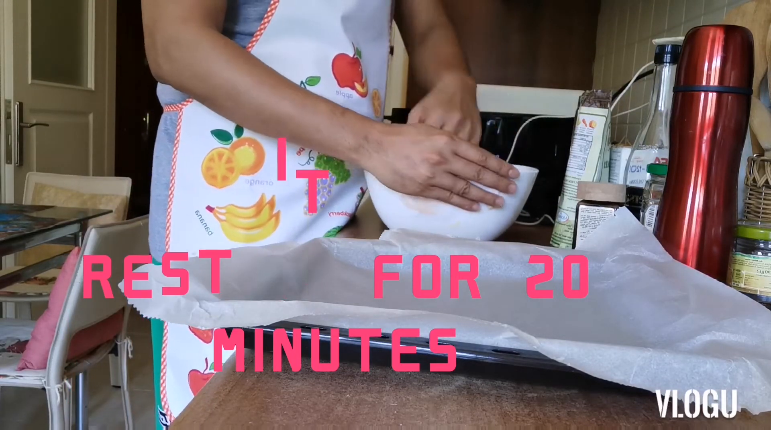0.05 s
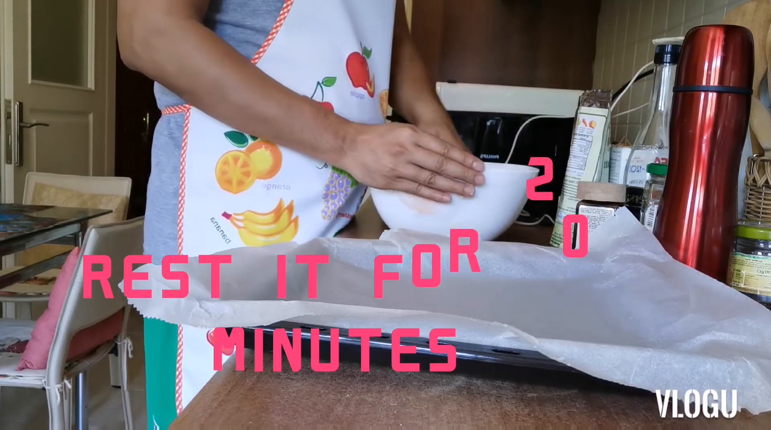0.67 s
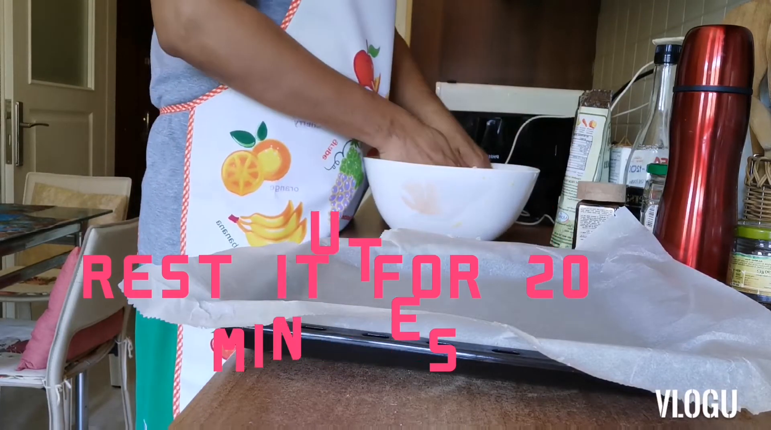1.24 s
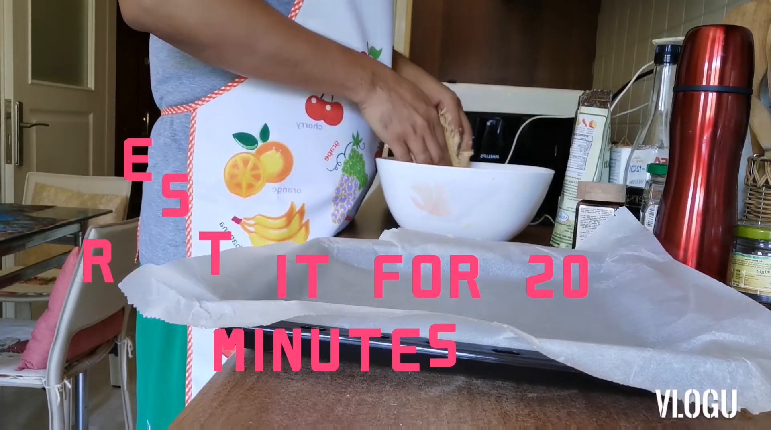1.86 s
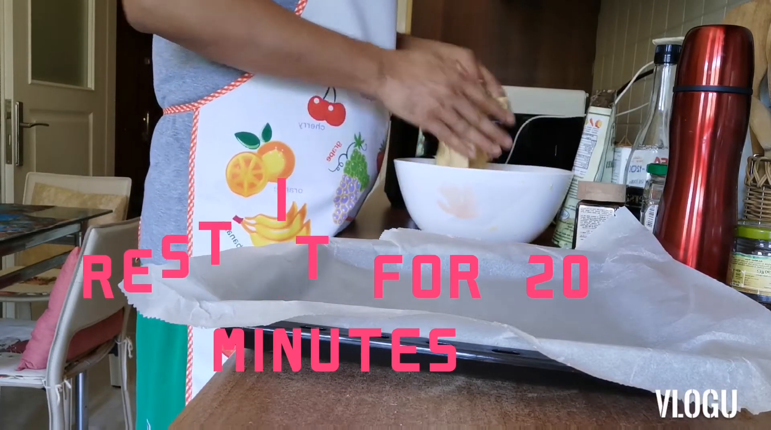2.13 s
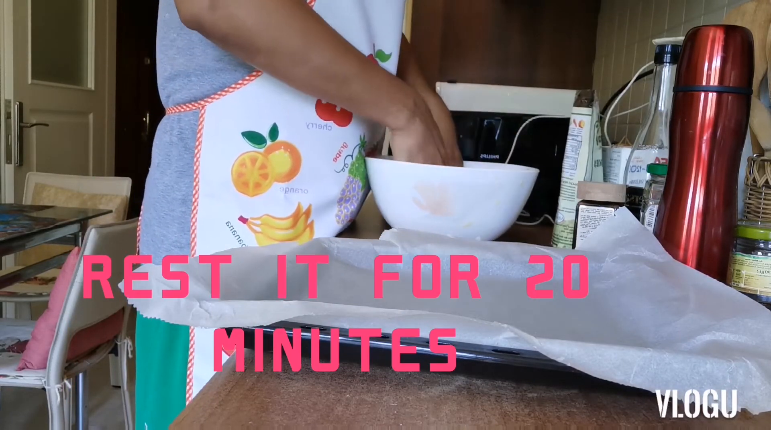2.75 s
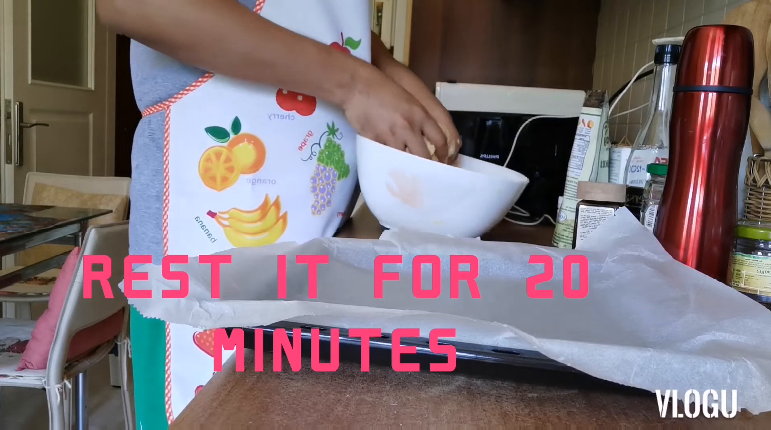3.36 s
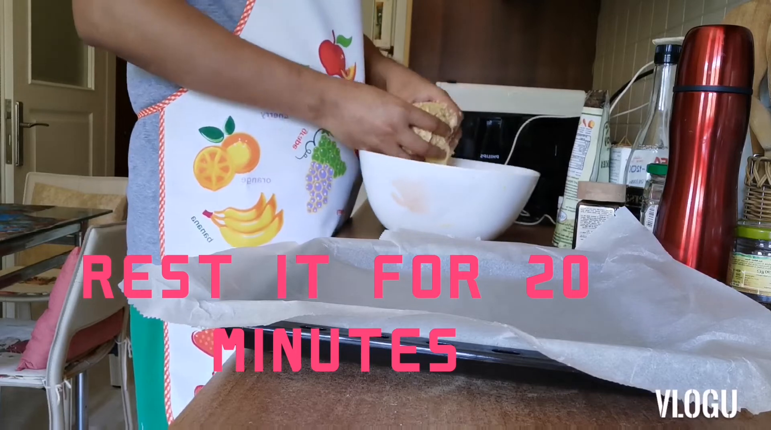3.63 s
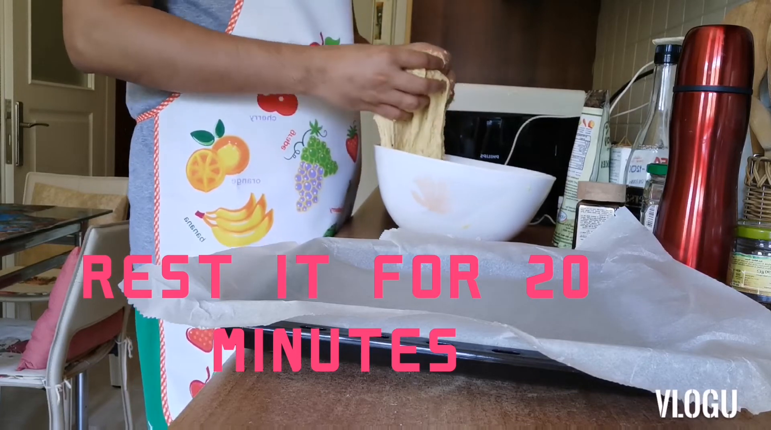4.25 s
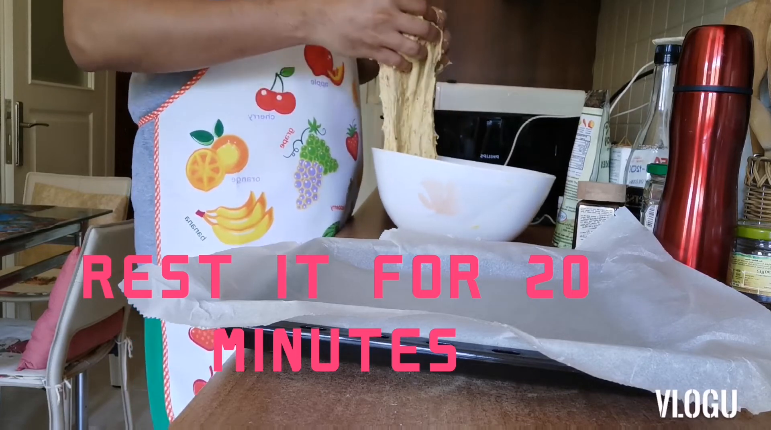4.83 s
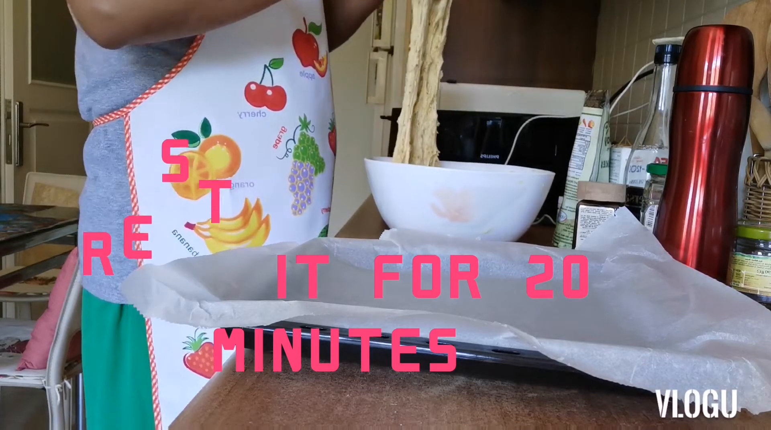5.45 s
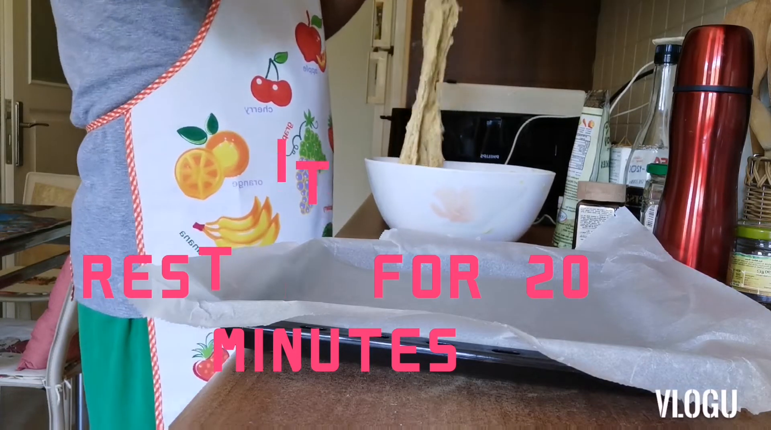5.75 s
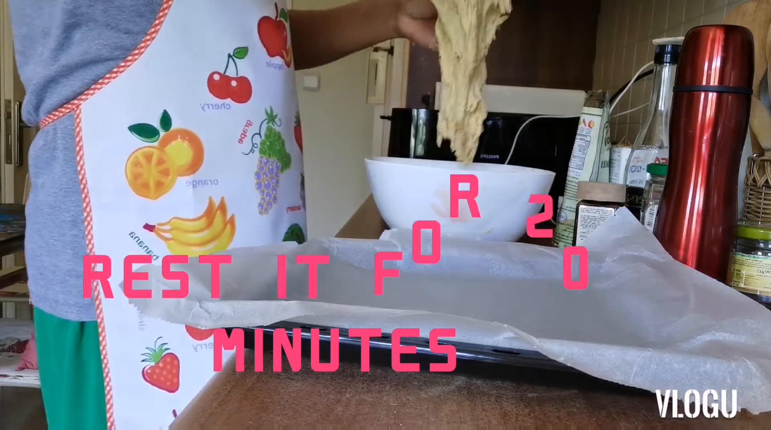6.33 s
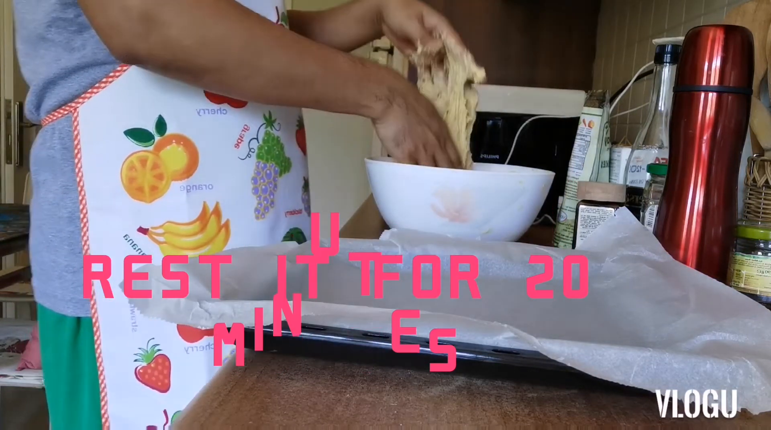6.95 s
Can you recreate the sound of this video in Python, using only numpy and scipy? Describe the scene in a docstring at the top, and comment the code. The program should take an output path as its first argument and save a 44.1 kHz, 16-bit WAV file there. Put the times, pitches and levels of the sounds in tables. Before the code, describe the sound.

Close to the microphone in a small, quiet kitchen, a bowl of dough bumps down on a worktop. Soft wet squeezing follows, mixed with hollow scuffs, a faint ring of the rim and a brief groan from the bowl's foot. Two loud knocks with wet splats come about a second and a half apart, then a couple of dull bumps. Hands and apron swish faintly over a low room hum.

```python
"""Soft, sticky dough squelches and hands and apron swish: someone is kneading at a kitchen worktop.
The bowl lifts with the dough and knocks back down with a thud and a wet splat. Its foot scuffs and
groans along the top, and once a light catch sets its rim ringing. All is close to a single
microphone; behind it, a small room with a low hum answers."""
import sys
import numpy as np
from scipy import signal
from scipy.fft import rfft, irfft
from scipy.io import wavfile
from scipy.ndimage import uniform_filter1d

SR = 44100
rng = np.random.default_rng(int(sys.argv[2]) if len(sys.argv) > 2 else 0)


def dump(signal):
    """Clip the signal to [-1, 1] and save it as 16-bit WAV at the path in sys.argv[1]."""
    limited = np.clip(np.atleast_2d(signal).T, -1, 1)
    pcm = np.round(limited * 32767).astype(np.int16)
    wavfile.write(sys.argv[1], SR, pcm)


N = 308259
BLOW_SIZE = 16384  # samples in one short sound
TIME = np.arange(N) / SR
AGE = np.arange(BLOW_SIZE) / SR


def amp(db):
    """Decibels to gain."""
    return 10 ** (np.asarray(db) / 20)


def unit(x):
    """Scale to rms 1."""
    return x / np.sqrt(np.mean(x ** 2))


def unit_blow(x):
    """Scale a short sound to the energy of 20 ms at rms 1."""
    return x / np.sqrt(np.sum(x ** 2) / (.02 * SR))


def decay(t60):
    """A fade that falls 60 dB in t60 seconds."""
    return np.exp(-np.log(1000) * AGE / t60)


def burst(fade_s):
    """White noise dying away with time constant fade_s."""
    return rng.standard_normal(BLOW_SIZE) * np.exp(-AGE / fade_s)


def read(points, hz):
    """Read a table of (f/Hz, value) on a log-frequency axis."""
    f, value = np.transpose(points)
    return np.interp(np.log(np.maximum(hz, 1)), np.log(f), value)


def colour(x, points, size=8192):
    """Causal filter with the given (f/Hz, level/dB) shape."""
    gain = amp(read(points, np.fft.rfftfreq(size, 1 / SR)))
    cepstrum = irfft(np.log(gain))
    cepstrum[1:size // 2] *= 2
    cepstrum[size // 2 + 1:] = 0
    response = irfft(np.exp(rfft(cepstrum)))
    return signal.fftconvolve(x, response)[:len(x)]


def diffuse(x, size):
    """Even out a random burst's spectrum over `size` bins, so that it adds no boom of its own."""
    power = uniform_filter1d(np.abs(rfft(x)) ** 2, size=size)
    hz = np.fft.rfftfreq(len(x), 1 / SR)
    return colour(x, np.column_stack([hz, -10 * np.log10(power)])[1:])


def add(track, s, sound):
    """Mix a sound into the track at time s."""
    start = int(s * SR)
    track[start:start + len(sound)] += sound[:N - start]


def walk(rate):
    """A random wander with a spread near 1, taking `rate` steps a second."""
    steps = rng.standard_normal(4096)
    return np.interp(TIME * rate, np.arange(len(steps)), steps)


def wavering_tone(hz, drift_hz, rate):
    """A sine whose pitch wanders about hz."""
    return np.sin(2 * np.pi * np.cumsum(hz + drift_hz * walk(rate)) / SR)


def slips(rate, spread_db):
    """Tiny random slips, `rate` a second; spread_db makes a few far larger than the rest."""
    size = amp(spread_db * np.minimum(rng.exponential(size=N), 4))
    slipping = rng.random(N) < rate / SR
    return unit(slipping * size * rng.standard_normal(N))


def strokes(rows, shape, fade_ratio):
    """Gain of hand strokes, each above half strength for its length; a higher shape is blunter."""
    gain = np.zeros(N)
    for peak, length, db in rows:
        swell_s = length / (1 + fade_ratio)
        away = np.maximum((peak - TIME) / swell_s, (TIME - peak) / (swell_s * fade_ratio))
        near = away < 10
        gain[near] += amp(db) * .5 ** (away[near] ** shape)
    return gain


# Room tone spectrum: f/Hz, level/dB (levels in all tables are relative)
AIR_COLOUR = [(12, -34.5), (20, 2), (70, -6.5), (137, -12), (219, -14.5), (245, -18.5), (282, -21),
              (324, -22), (427, -19), (581, -26.5), (958, -26), (1340, -29.5), (5690, -44.5),
              (10800, -38.5), (15500, -44.5)]

def background(air_db=-66, hum_hz=213, hum_db=-75, waver_db=3, drift_hz=5):
    """Room tone all round the microphone: faint rumble and hiss with a wavering hum."""
    air = unit(colour(rng.standard_normal(N), AIR_COLOUR)) * amp(.5 * walk(15))
    hum = wavering_tone(hum_hz, drift_hz, rate=15) * amp(waver_db * walk(31))
    return amp(air_db) * air + amp(hum_db) * unit(hum)


# The kitchen's decay: f/Hz, t60/s
ROOM_T60 = [(80, 0.63), (200, 0.31), (600, 0.31), (2000, 0.29), (5000, 0.27), (12000, 0.25)]

def room_response(wet_db, early_db, build_s=0.0049, early_s=0.0061):
    """Direct sound, quick echoes from the cupboards, and a dense tail whose bass lasts longest."""
    spectrum = rfft(rng.standard_normal(BLOW_SIZE))
    hz = np.fft.rfftfreq(BLOW_SIZE, 1 / SR)
    centres = np.array(ROOM_T60)[:, 0]
    tail = np.zeros(BLOW_SIZE)
    for share, (_, t60) in zip(np.eye(len(centres)), ROOM_T60):
        band = irfft(spectrum * read(np.column_stack([centres, share]), hz))
        tail += band * decay(t60)
    tail *= 1 - np.exp(-AGE / build_s)
    early = burst(early_s) * np.sqrt(AGE)
    echoes = amp(wet_db) * tail / np.linalg.norm(tail) + amp(early_db) * early / np.linalg.norm(early)
    return signal.unit_impulse(BLOW_SIZE) + echoes


def kitchen(x, wet_db, early_db):
    """From worktop to microphone: direct sound and small-room echoes, drawn afresh for each call."""
    response = diffuse(room_response(wet_db, early_db), size=36)
    return signal.fftconvolve(x, response)[:len(x)]


# Bright spectrum of brushing, also of snaps and rim scratches: f/Hz, level/dB
BRUSH_COLOUR = [(600, -15.5), (1600, -1), (2600, -0.5), (3600, -3.5), (5200, 0.5), (7600, -4.5),
                (8800, 4.5), (10900, 4.5), (11800, -2.5), (13000, -9), (14200, -9), (15500, -12.5)]
# Hands and apron at the worktop: peak t/s, length/s, level/dB
BRUSHES = [(.08, 0.17, -71.5), (.35, .22, -81.5), (.70, 0.18, -70.5), (.85, 0.068, -64.5),
           (1.12, 0.26, -70.5), (1.56, 0.21, -75.5), (1.755, .07, -70), (2.10, 0.31, -79.5),
           (2.63, 0.079, -61.5), (2.83, 0.54, -84), (3.36, .18, -73), (3.46, .07, -66.5),
           (4.285, 0.021, -74.5), (4.775, 0.067, -55.5), (5.01, 0.095, -70.5), (6.53, 0.082, -76.5),
           (6.93, 0.1, -65)]

def brushing(uneven_db=1):
    """Skin and cloth slide in a fine, dense grain."""
    grain = slips(rate=13000, spread_db=3.0) * amp(uneven_db * walk(60))
    return strokes(BRUSHES, shape=2.2, fade_ratio=1.05) * unit(colour(grain, BRUSH_COLOUR))


# Sticky threads snapping in the bowl: t/s, level/dB
SNAPS = [(1.518, -68), (3.002, -82), (4.006, -78), (4.604, -80)]

def snaps(snap_s=.0012):
    """Threads of dough part with tiny bright clicks."""
    out = np.zeros(N)
    for s, db in SNAPS:
        click = colour(burst(snap_s), BRUSH_COLOUR)
        add(out, s, amp(db) * unit_blow(click))
    return out


# The rim's ring: f/Hz, level/dB
RIM_MODES = [(3068, -9), (4129, 1), (5195, -2), (5652, -4), (6465, 0), (7074, -1), (9329, 2), (11090, 0),
             (12834, -12), (14616, -14)]
# One light catch on the rim, chattering: t/s, level/dB
RIM_TICKS = [(2.462, -65), (2.483, -63), (2.506, -66.5), (2.526, -70)]

def rim(level_db=-1, t60=0.09, detune=0.0089, scratch_s=0.019, scratch_db=1, touch_s=0.004):
    """Light grazing touches scratch the rim and wake its high modes."""
    out = np.zeros(N)
    onset = 1 - np.exp(-AGE / touch_s)
    for s, db in RIM_TICKS:
        ring = sum(amp(mode_db) * np.sin(2 * np.pi * hz * (1 + detune * rng.standard_normal()) * AGE)
                   for hz, mode_db in RIM_MODES)
        scratch = colour(burst(scratch_s), BRUSH_COLOUR)
        touch = unit_blow(ring * decay(t60)) + amp(scratch_db) * unit_blow(scratch)
        add(out, s, amp(db + level_db) * touch * onset)
    return out


# The squelch, heard close: f/Hz, level/dB
SQUELCH_COLOUR = [(60, -17), (150, -5), (240, -6.5), (400, -1.5), (640, -5.5), (880, -6), (1150, -16),
                  (2400, -19), (3300, -32.5), (5000, -37.5), (9000, -58)]
# Wet dough squeezed between the fingers: peak t/s, length/s, level/dB
SQUEEZES = [(.04, 0.29, -70), (.72, 0.22, -68), (1.17, 0.14, -73.5), (1.45, 0.16, -70.5),
            (1.59, 0.086, -61.5), (1.80, 0.079, -59.5), (1.99, .13, -60), (2.13, 0.11, -56),
            (2.61, 0.11, -51), (2.82, 0.17, -70.5), (3.315, 0.17, -56.5), (3.47, 0.062, -61.5),
            (3.63, 0.13, -61), (3.97, 0.12, -71), (5.03, 0.18, -75)]

def kneading(level_db=6, uneven_db=4.0):
    """Sticky dough peels from skin and bowl in a dense run of tiny slips."""
    peeling = slips(rate=2800, spread_db=0.0) * amp(uneven_db * walk(42))
    squelch = unit(colour(peeling, SQUELCH_COLOUR))
    return amp(level_db) * strokes(SQUEEZES, shape=2.7, fade_ratio=1.2) * squelch


# Spectrum of the foot's hollow scuff: f/Hz, level/dB
SCUFF_COLOUR = [(50, -38), (90, -5), (170, -7), (240, 5.5), (305, 4), (390, 2), (540, -12.5), (640, 1.5),
                (820, -11.5), (1100, -21.5), (2000, -33), (4000, -51)]
# A soft, heavy load on the worktop, rumbling or thudding: f/Hz, level/dB
THUD_COLOUR = [(30, -23.5), (58, -4.5), (85, 3), (120, 1.5), (180, -2), (260, -13), (500, -28.5),
               (2000, -57.5)]
# The shoved bowl judders over the worktop: peak t/s, length/s, scuff level/dB, rumble level/dB
SHOVES = [(0.13, 0.11, -75, -61), (1.793, 0.077, -53, -51.5), (1.97, .17, -53.5, -52.5),
          (2.14, .11, -52, -58), (2.36, .1, -78, -59), (2.52, .09, -80, -59), (2.627, 0.098, -45, -65),
          (2.904, .25, -74, -71.5), (3.30, .1, -56.5, -58), (3.503, 0.072, -49, -53.5),
          (3.63, .06, -37, -53.5), (3.971, .08, -58.5, -62.5)]
# The groan's resonances: f/Hz, pitch shake/Hz, level/dB
GROAN_MODES = [(311.5, 10.8, 2), (382, 20.1, 2.5), (787, 26.1, -7), (843, 27, -5)]
# Groans from hard shoves: peak t/s, length/s, level/dB
GROANS = [(0.597, 0.017, -53.5), (2.64, 0.077, -42.5)]

def scuffing(scuff_trim_db=-1.0, uneven_db=1.5):
    """The bowl's foot sticks and slips: a hollow scuff, a low rumble under load and two groans."""
    friction = slips(rate=2600, spread_db=1.96) * amp(uneven_db * walk(40))
    peak, length, scuff_db, rumble_db = np.transpose(SHOVES)
    scuff = unit(colour(friction, SCUFF_COLOUR))
    scuff *= strokes(zip(peak, length, scuff_db), shape=2.1, fade_ratio=1.2)
    rumble = unit(colour(friction, THUD_COLOUR))
    rumble *= strokes(zip(peak, length, rumble_db), shape=2.1, fade_ratio=1.2)
    # the slips lock on to a few resonances, whose pitch shakes with the load
    groan = unit(sum(amp(db) * wavering_tone(hz, shake, rate=120) for hz, shake, db in GROAN_MODES))
    groan *= strokes(GROANS, shape=1.33, fade_ratio=1.0)
    return amp(scuff_trim_db) * scuff + rumble + groan


# Spectrum of the bowl's crack on the worktop: f/Hz, level/dB
KNOCK_COLOUR = [(40, -21), (90, -13.5), (190, 1), (250, -3.5), (340, 4.5), (490, 2), (900, -3.5),
                (1300, -11), (2400, -20), (3300, -33), (4400, -39.5), (5200, -44), (6300, -54.5),
                (15000, -62)]
# Spectrum of the dough's wet splat: f/Hz, level/dB
SPLAT_COLOUR = [(500, -5), (1300, 7.5), (2500, 6.5), (3400, -9), (4600, -12), (5150, 0.5), (5800, -14.5),
                (8200, -16.5), (9200, -5), (10800, -14), (12000, -23.5), (15500, -23.5)]
# Bowl and worktop ringing together: f/Hz, level/dB, t60/s
BOWL_MODES = [(128, -3.5, 0.26), (155, 1.5, 0.18), (198, -5.5, 0.12), (291, -7.5, 0.17), (356, -3, 0.25),
              (396.5, -4, 0.21), (496, 5, 0.12), (551, 8, 0.15), (646, -1, 0.19), (693, 7, 0.15),
              (837, -4, 0.12), (1015, -4, 0.2), (1178, -8.5, .15), (1323, -11, 0.14), (1885, -13, 0.13),
              (5220, -28.5, .15)]
# The bowl lands edge first, drops flat and settles: share of rocking time, level/dB, treble/dB
CONTACTS = [(0, -3, 4), (0.159, 0, 0.5), (0.422, 0, -8), (1.002, -11, -9.5)]
# Bowl and dough come down in front of the microphone:
# t/s, rocking time/s, knock level/dB, thud level/dB, splat level/dB, hardness as treble/dB
LANDINGS = [(0.339, 0.013, -62, -60, -97, -9), (0.634, .034, -40, -39, -59, -4.5),
            (0.903, .022, -30, -39, -53, -6), (1.386, 0.031, -64, -51.5, -87, -17),
            (1.740, 0.032, -55, -57, -77, -11), (2.403, 0.0095, -72, -67, -85, -10),
            (2.459, 0.012, -49, -51, -85, -18), (3.016, .03, -44.5, -46.5, -78, -14),
            (3.071, .015, -60, -59, -79, -5), (3.680, .026, -26.5, -35.5, -41.5, 1),
            (3.698, .012, -23.5, -39.5, -45, 1), (5.2085, .024, -26, -38.5, -41.5, -3.5),
            (5.315, 0.016, -47, -75, -72, -1), (5.940, .03, -60, -53.5, -83, -5.5),
            (5.983, 0.021, -67.5, -53.5, -90, -20), (6.918, .03, -53, -46, -77, -12)]

def knocks(level_db=-2.0, ring_db=-9.5, hard_hz=1700, thud_s=0.038,
           splat_s=0.023, splat_tail_db=-20, splat_t60=.26):
    """Each landing is a few quick contacts that crack and ring, with the dough's splat and thud."""
    out = np.zeros(N)
    crack = colour(signal.unit_impulse(BLOW_SIZE), KNOCK_COLOUR)
    ring = sum(amp(db) * (-1) ** k * np.sin(2 * np.pi * hz * AGE) * decay(t60)
               for k, (hz, db, t60) in enumerate(BOWL_MODES))
    strike = unit_blow(crack) + amp(ring_db) * unit_blow(ring)
    # the dough spreads after the contact, so its splat swells before it dies away in the room
    swell = 1 - np.exp(-AGE / splat_s)
    fade = np.exp(-AGE / splat_s) + amp(splat_tail_db) * decay(splat_t60)
    for s, rocking_s, db, thud_db, splat_db, hard_db in LANDINGS:
        for share, contact_db, treble_db in CONTACTS:
            knock = kitchen(strike, wet_db=-2.0, early_db=5.0)
            # a softer contact loses its treble
            knock = colour(knock, [(hard_hz / 2, 0), (hard_hz, hard_db + treble_db)])
            add(out, s + share * rocking_s, amp(db + contact_db) * unit_blow(knock))
        splat = colour(rng.standard_normal(BLOW_SIZE) * swell * fade, SPLAT_COLOUR)
        thud = colour(diffuse(burst(thud_s), size=16), THUD_COLOUR)
        add(out, s, amp(splat_db) * unit_blow(splat) + amp(thud_db) * unit_blow(thud))
    return amp(level_db) * out


def scene():
    """One microphone near the worktop: knocks and handwork in front, room tone behind."""
    handwork = kneading() + scuffing() + brushing() + snaps() + rim()
    handwork = kitchen(handwork, wet_db=-9.0, early_db=-1.5)
    return (knocks() + handwork + background())[None]


def record(dry, top_hz=15700):
    """The recorder cuts the top steeply."""
    lowpass = signal.ellip(12, .1, 80, top_hz, fs=SR, output="sos")
    return signal.sosfilt(lowpass, dry)


dry = scene()
out = record(dry)
dump(out)
```